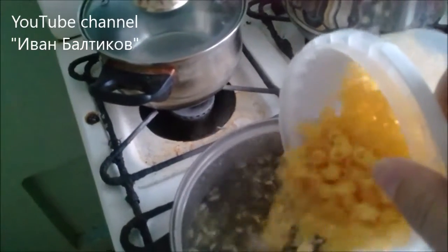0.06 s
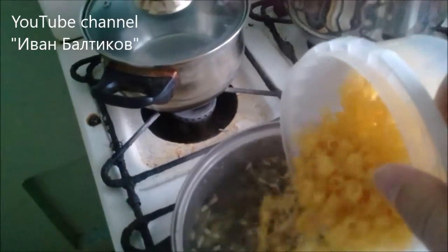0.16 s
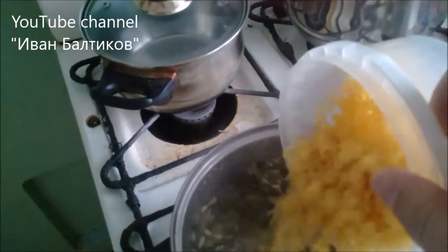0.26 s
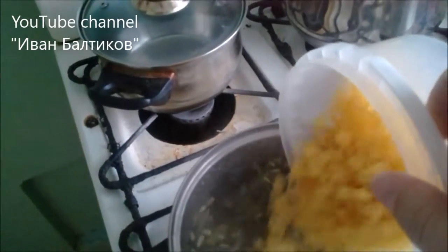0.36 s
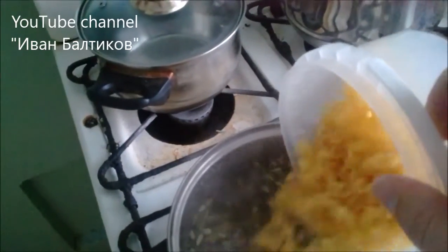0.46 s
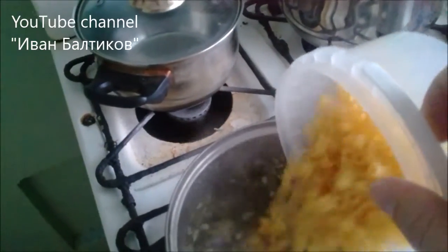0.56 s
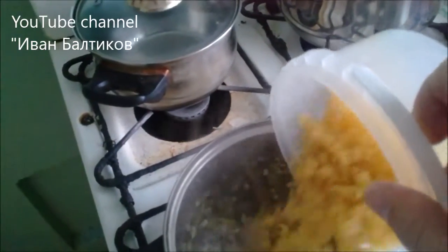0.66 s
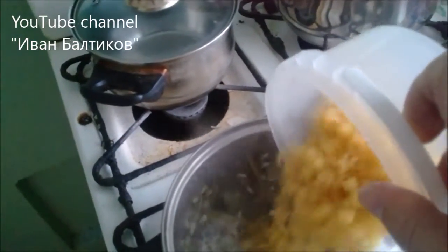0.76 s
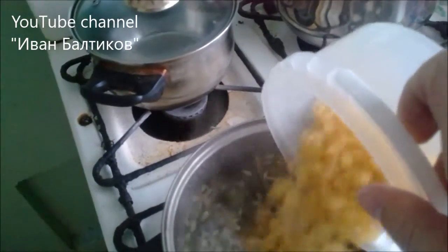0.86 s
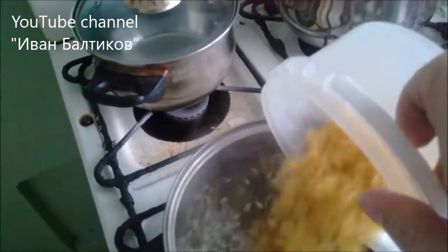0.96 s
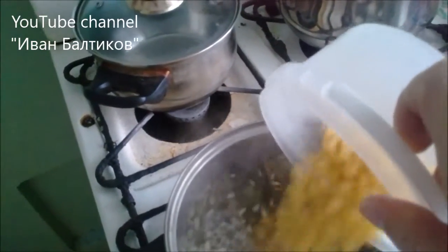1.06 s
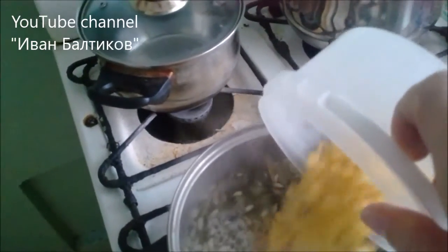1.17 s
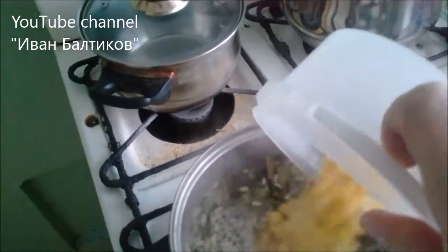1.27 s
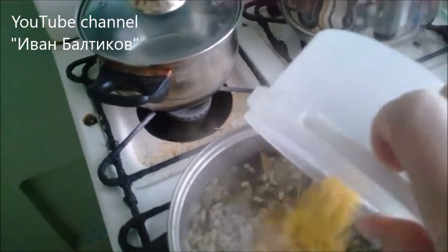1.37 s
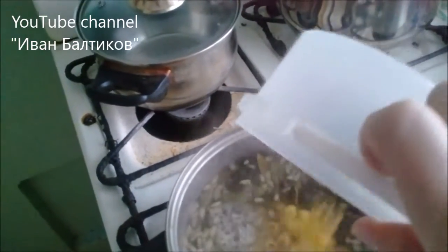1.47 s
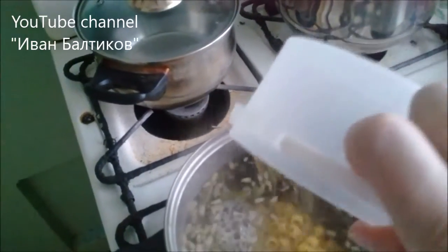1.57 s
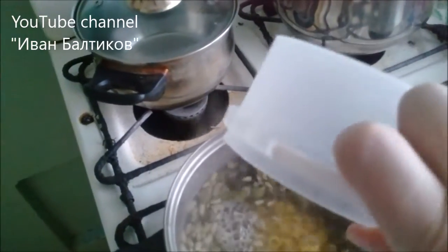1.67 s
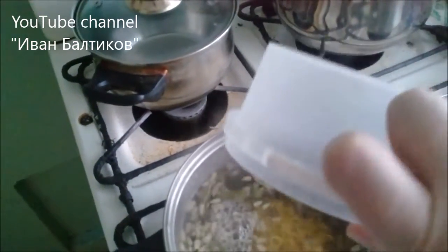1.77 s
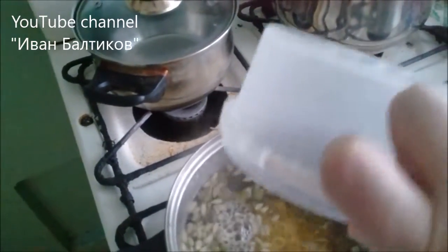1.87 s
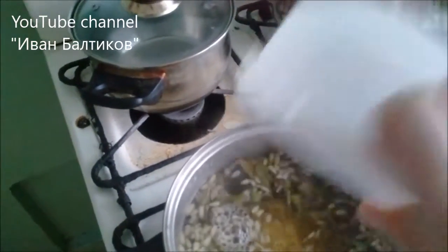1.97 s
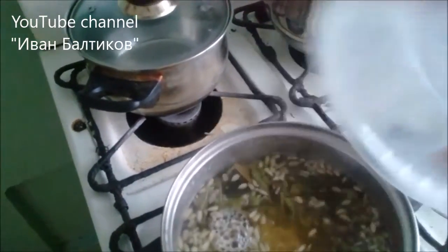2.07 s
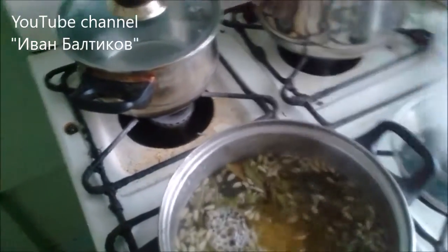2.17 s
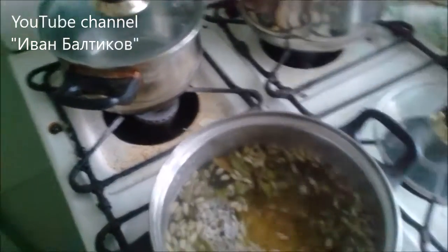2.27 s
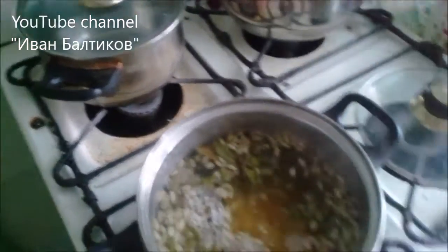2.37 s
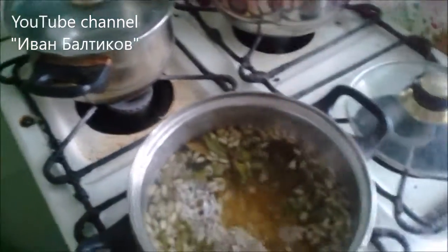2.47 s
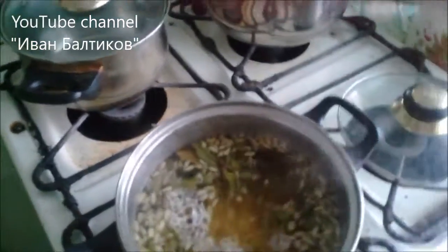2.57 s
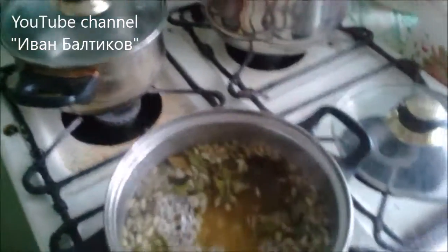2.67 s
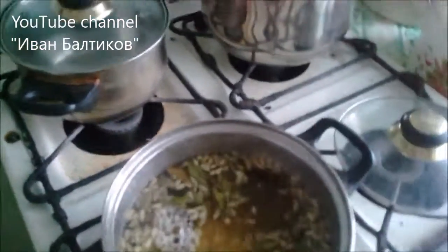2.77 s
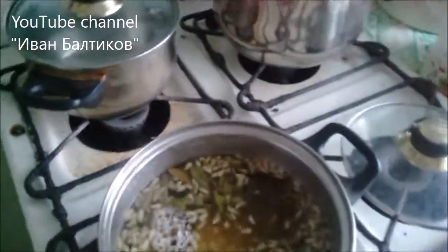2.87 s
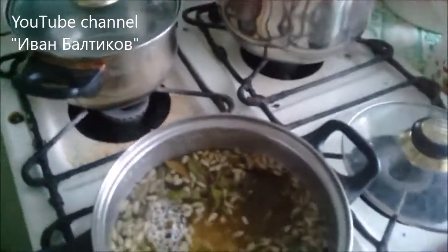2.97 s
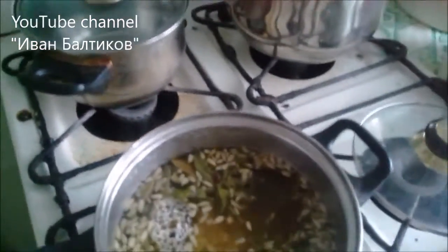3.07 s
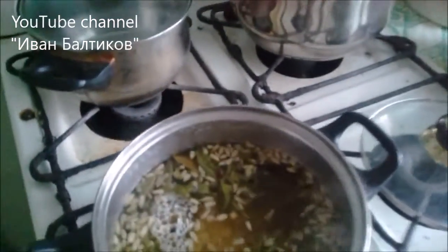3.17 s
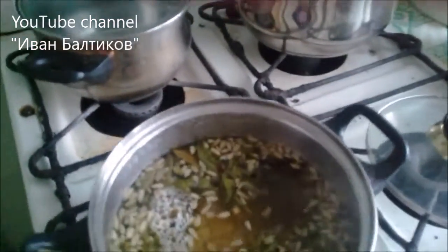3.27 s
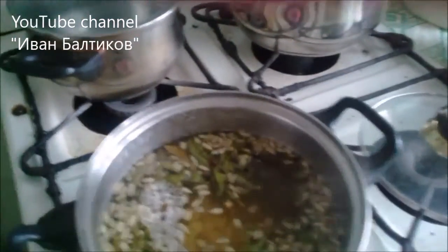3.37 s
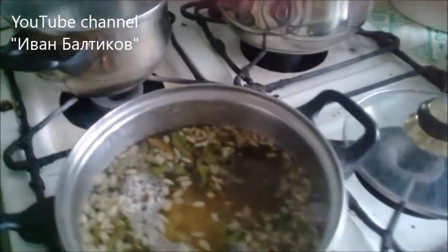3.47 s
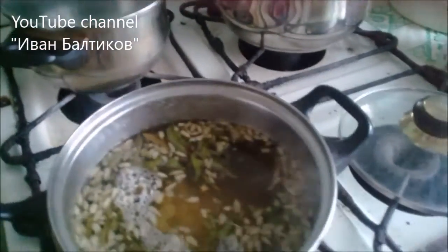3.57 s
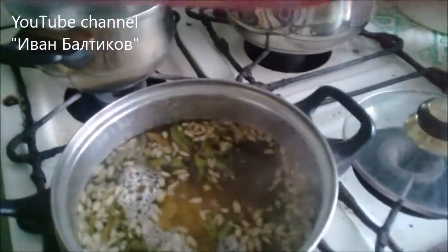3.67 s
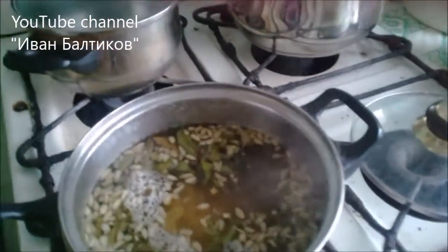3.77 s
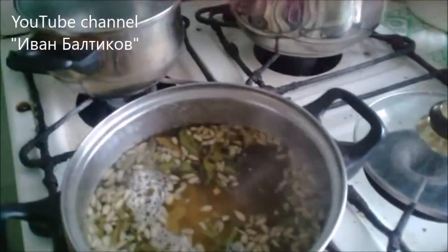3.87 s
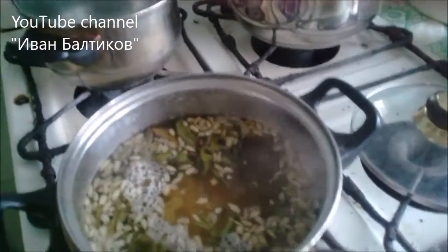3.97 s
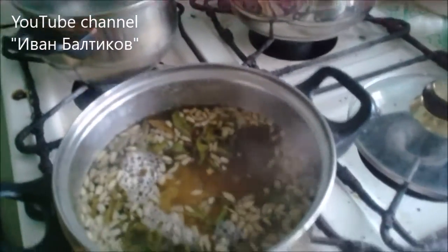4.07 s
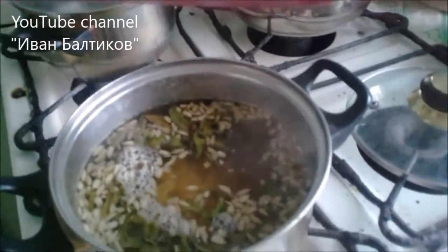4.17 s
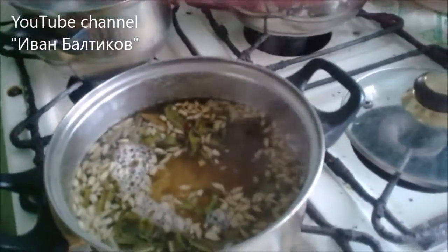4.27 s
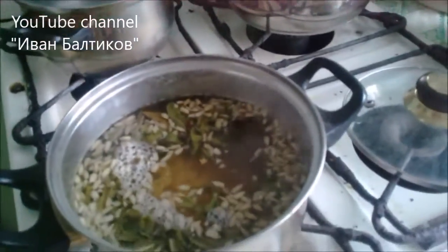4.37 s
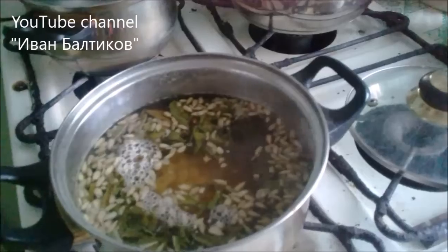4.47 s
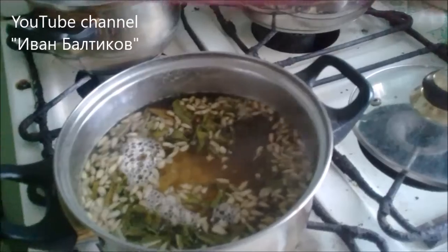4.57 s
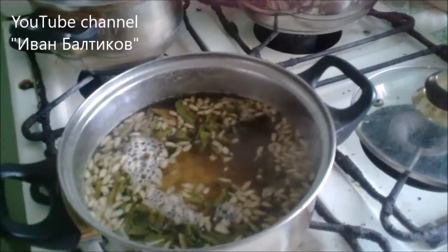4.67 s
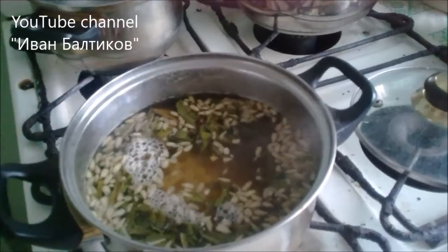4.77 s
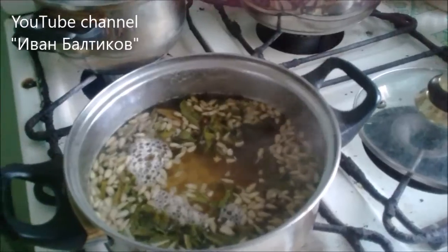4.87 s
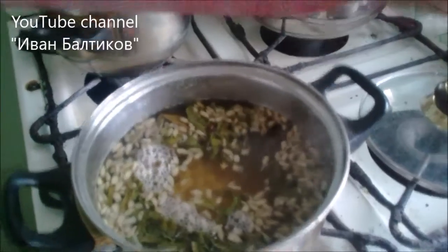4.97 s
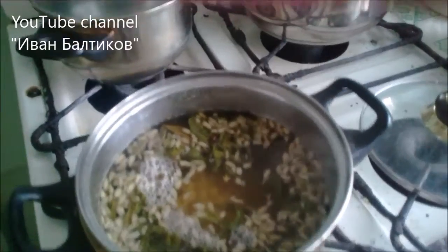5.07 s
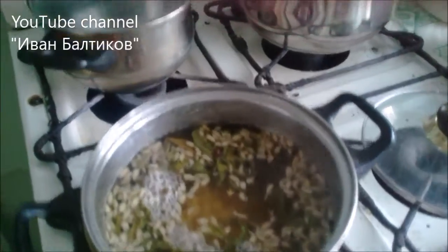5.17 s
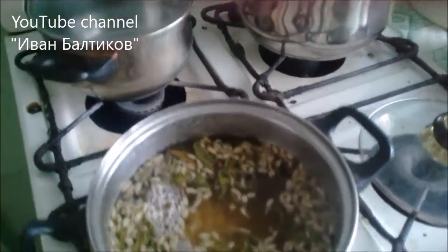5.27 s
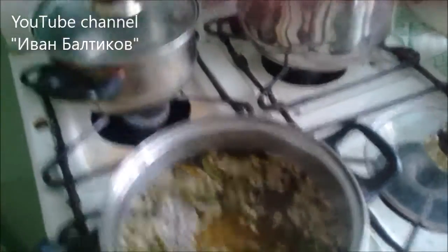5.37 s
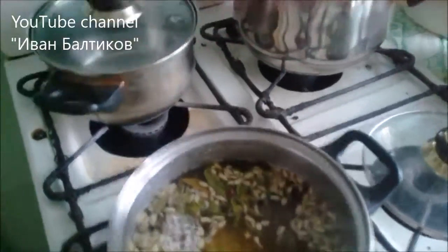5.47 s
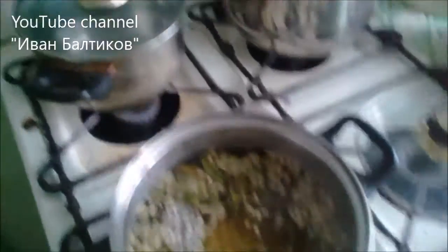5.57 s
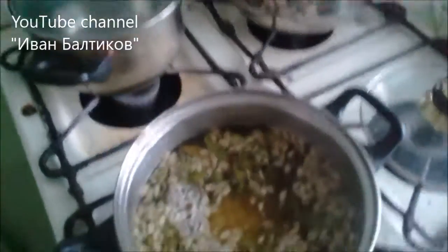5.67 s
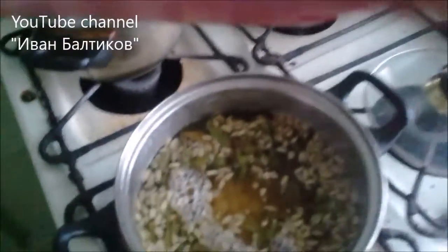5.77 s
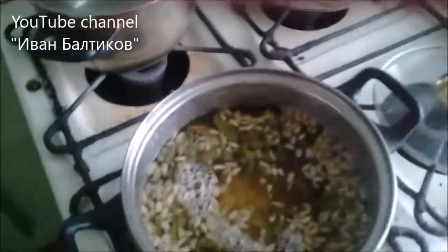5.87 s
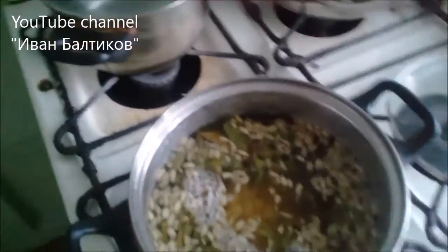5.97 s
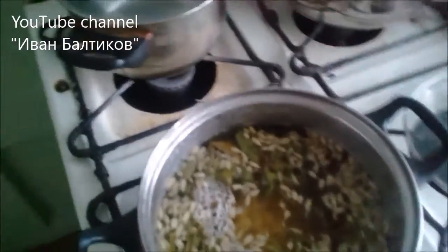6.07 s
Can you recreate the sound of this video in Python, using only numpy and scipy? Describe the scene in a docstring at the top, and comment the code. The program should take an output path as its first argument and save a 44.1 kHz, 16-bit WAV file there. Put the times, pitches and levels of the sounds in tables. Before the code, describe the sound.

Close by in a kitchen, dry pasta slides out of a plastic tub, ticking and rattling against its walls and splashing softly into broth for about a second and a half. Sharp little taps, sleeve swishes and light wooden knocks follow. The empty tub is put down with one loud hollow knock, then come more small knocks and a faint scrape. A gas flame and simmering soup hiss very quietly throughout.

```python
"""Pasta into simmering soup

Dry pasta slides out of a plastic tub, close by in a kitchen: the pieces tick, rattle against the walls
and splash into the broth. Then come sharp taps, sleeve swishes and light knocks off to the side. The
empty tub lands with one hollow knock; a faint drone swells twice and something scrapes the worktop.
The gas flame hisses and the soup fizzes underneath throughout."""
import sys
import numpy as np
from scipy import signal
from scipy.fft import rfft, irfft, next_fast_len
from scipy.io import wavfile
from scipy.ndimage import uniform_filter1d, map_coordinates

SR = 44100
rng = np.random.default_rng(int(sys.argv[2]) if len(sys.argv) > 2 else 0)


def waveform_to_disk(signal):
    """Save audio, clipped to [-1, 1], as 16-bit WAV at the path in sys.argv[1]."""
    frames = np.transpose(np.atleast_2d(signal))
    scaled = np.clip(frames, -1, 1) * 32767
    samples = np.round(scaled).astype(np.int16)
    wavfile.write(sys.argv[1], SR, samples)


N = 269803

# How hard the pasta flows. Each row: time in seconds, level in dB.
POUR_FLOW = [(0, -28.5), (.2, -26), (.45, -23.5), (.85, -22.5), (1.3, -21.5), (1.53, -27), (1.615, -37)]
# Tone of pasta hitting the tub. Each row: frequency in Hz, relative level in dB.
RATTLE_EQ = [(300, -54.5), (900, -30), (1500, -16.5), (1850, -4), (2300, -2.5), (2800, -0.5), (3400, 1.5),
             (4000, -10), (4600, -7.5), (5800, -16.5), (9000, -44), (16000, -51.5)]
# Tone of the pieces' bright ticking. Each row: frequency in Hz, relative level in dB.
TICK_EQ = [(1500, -44), (4000, -16), (5800, -12), (6700, -8.5), (8500, -10), (9500, -5), (10400, 0.5),
           (11300, -7), (12500, -13.5), (14000, -20.5), (16000, -24.5)]
# Resonances of the tub's walls during the pour. Each row: pitch in Hz, width in Hz, gain in dB.
WALL_MODES = [(2100, 160, -2.5), (3320, 200, 0), (3540, 160, -1)]
# The thin click on top of a tap or knock. Each row: frequency in Hz, relative level in dB.
CLICK_EQ = [(100, -36.5), (600, -8.5), (1800, -1.5), (2900, 6), (4200, -5.5), (6000, -6), (8500, -3),
            (10300, 7.5), (12000, -7), (16000, -20.5)]


def amp(db):
    """Decibels to gain."""
    return 10 ** (np.asarray(db) / 20)


def unit(x):
    """Scale to rms 1."""
    return x / np.sqrt(np.mean(x ** 2) + 1e-20)


def along(points, hz):
    """Read (Hz, value) points on a log frequency axis."""
    freqs, values = np.transpose(points)
    return np.interp(np.log(hz + 1), np.log(freqs + 1), values)


def since(s):
    """Seconds gone since time s, 0 before it."""
    return np.maximum(np.arange(N) / SR - s, 0)


def decay(t, t60):
    """Envelope that falls 60 dB in t60 seconds."""
    return np.exp(-np.log(1000) * t / t60)


def during(rows):
    """Soft-edged gate, open from a table's first time to its last."""
    t = since(0)
    return uniform_filter1d(1. * ((t >= rows[0][0]) & (t <= rows[-1][0])), size=600)


def stroke(s, length, rise, release_db_per_s):
    """Envelope that swells from time s as time to the power of rise, then dies away."""
    return np.clip(since(s) / length, 0, 1) ** rise * amp(-release_db_per_s * since(s + length))


def wobble(rate):
    """A smooth random curve, rate knots a second."""
    return map_coordinates(rng.standard_normal(int(N * rate / SR) + 4), [np.arange(N) * rate / SR])


def add(track, s, sound):
    """Mix a sound into a track at time s."""
    part = track[max(round(s * SR), 0):][:len(sound)]
    part += sound[:len(part)]


def colour(x, eq, size=4096):
    """Minimum-phase EQ of unit energy: the curve sets the tone, not the level."""
    cepstrum = irfft(np.log(amp(along(eq, np.fft.rfftfreq(size, 1 / SR)))))
    cepstrum[1:size // 2] *= 2
    cepstrum[size // 2 + 1:] = 0
    kernel = irfft(np.exp(rfft(cepstrum)))
    return signal.fftconvolve(x, kernel / np.linalg.norm(kernel))[:len(x)]


def resonate(x, modes):
    """Ring x through (pitch Hz, width Hz, gain dB) resonances."""
    return sum(amp(db) * signal.lfilter(*signal.iirpeak(hz, hz / width, SR), x)
               for hz, width, db in modes)


def burst(t60):
    """A noisy contact of unit energy."""
    t = np.arange(SR // 10) / SR
    noise = rng.standard_normal(len(t)) * decay(t, t60)
    return noise / np.linalg.norm(noise)


def grains(rate, lo_hz, hi_hz, t60, spread_db):
    """Random contacts, rate a second, each a ping at its own pitch; rms 1."""
    t = np.arange(SR // 20) / SR
    t = t[t < t60]
    onsets = np.flatnonzero(rng.random(N) < rate / SR)
    sizes = amp(spread_db * np.clip(rng.standard_normal(N), -2, 2))[onsets, None]
    pitch = rng.uniform(lo_hz, hi_hz, N)[onsets, None]
    polarity = rng.choice([-1, 1], N)[onsets, None]
    pings = sizes * polarity * np.sin(2 * np.pi * pitch * t) * decay(t, t60)
    positions = onsets[:, None] + np.arange(len(t))
    cloud = np.bincount(positions.ravel(), pings.ravel(), N)[:N]
    return unit(cloud / np.sqrt(rate))  # density changes the texture, not the level


def room_tail():
    """The kitchen's reverb, of unit energy; the treble dies first."""
    # Each row: frequency in Hz, time to fall 60 dB in seconds.
    reverb_times = [(150, 0.77), (400, 0.6), (1000, 0.39), (2800, 0.4), (7000, 0.33), (14000, 0.23)]
    hz, t, noise = signal.stft(rng.standard_normal(SR * 3 // 4), SR, nperseg=256)
    tail = signal.istft(noise * decay(t, along(reverb_times, hz)[:, None]), SR, nperseg=256)[1]
    return tail / np.linalg.norm(tail)


def in_room(x, wet_db):
    """Direct sound plus reverb, at the same total power."""
    reverb = amp(wet_db) * signal.fftconvolve(x, room_tail())[:N]
    return (x + reverb) / np.hypot(1, amp(wet_db))


def far_blow(direct):
    """A contact some way off: a little direct sound, mostly room."""
    blow = room_tail()
    add(blow, 0, direct * burst(t60=0.018))
    return blow


def stove():
    """The gas flame hisses, the soup fizzes, and now and then a bubble bursts."""
    # Tones of flame, fizz and bubble. Each row: frequency in Hz, relative level in dB.
    flame_eq = [(25, -4), (80, -17), (150, -5.5), (400, 0.5), (1000, 0), (1800, 1.5), (2700, -1.5),
                (3600, -7), (6000, -13), (8500, -10), (10300, -4), (12000, -13), (16000, -19)]
    fizz_eq = [(2000, -31.5), (6000, -14), (8500, -13), (10300, 3), (12000, -12), (15500, -14)]
    pop_eq = [(2000, -36), (6000, -13.5), (8500, -12.5), (10300, 3), (12000, -12), (15500, -10.5)]
    # The loudest bubbles. Each row: start in seconds, level in dB.
    pops = [(2.354, -26.5), (3.5643, -17), (3.7019, -23), (3.9479, -30), (4.4833, -30.5), (5.0387, -27.5),
            (5.242, -24.5)]
    flame = amp(-61.5 + 0.54 * wobble(5.8)) * unit(colour(rng.standard_normal(N), flame_eq))
    bubbles = grains(350, 6000, 14000, t60=.0012, spread_db=5.0)
    simmer = amp(-66.5) * unit(colour(bubbles, fizz_eq))
    for s, db in pops:
        add(simmer, s, amp(db) * colour(burst(t60=0.0033), pop_eq))
    return flame + in_room(simmer, wet_db=-2)


def pasta():
    """Pieces tumble in clumps, ticking, ringing the tub and landing in broth. The flow drives it all."""
    full_rate = 2600  # collisions a second at full flow
    bulk_gone_s, thinning_db_per_s = 1.451, 145  # then only stragglers: the rattle dies before the ticks
    flow_db = np.interp(since(0), *np.transpose(POUR_FLOW))
    bulk_db = flow_db - thinning_db_per_s * since(bulk_gone_s)
    thin_db = flow_db.max() - flow_db
    rate = full_rate * amp(-thin_db) ** 1.1
    clump_db = 1.15 + 0.071 * thin_db  # a thinner stream is lumpier
    clumps = during(POUR_FLOW) * unit(amp(clump_db * wobble(90) + 1.47 * wobble(500)))
    contacts = grains(rate, 1190, 5420, t60=0.0071, spread_db=0)
    rattle = amp(bulk_db - 2) * unit(colour(contacts, RATTLE_EQ))
    wall_db = bulk_db - 12.5 + 4.5 * since(0)  # the walls ring freer as the load leaves
    walls = amp(wall_db) * unit(resonate(contacts, WALL_MODES))
    fine_contacts = grains(2 * rate, 3970, 16000, t60=0.0021, spread_db=1.5)
    ticks = amp(flow_db) * unit(colour(fine_contacts, TICK_EQ))
    in_tub = clumps * (rattle + walls + ticks) + clacks(bulk_db)
    return in_room(in_tub, wet_db=-12) + in_room(splash(bulk_db, rate), wet_db=-4.5)


def splash(bulk_db, rate):
    """Loudest as the stream plunges into the broth, softer as the growing heap cushions it."""
    # Tone of the broth. Each row: frequency in Hz, relative level in dB.
    splash_eq = [(30, -26), (80, -40), (150, -21.5), (300, -18.5), (500, -17), (750, -2), (1200, -1.5),
                 (1800, -4.5), (4000, -32.5)]
    plunge_s, plunge_fade_s, heap_db_per_s = .206, 0.29, 4.5
    plunge_db = 8.5 * (since(plunge_s) > 0) * np.exp(-since(plunge_s) / plunge_fade_s)
    level_db = bulk_db - 17 + plunge_db - heap_db_per_s * since(0) + 1.7 * wobble(24.94)
    plops = grains(rate / 3, 203, 2000, t60=0.025, spread_db=1)
    return amp(level_db) * during(POUR_FLOW) * unit(colour(plops, splash_eq))


def clacks(bulk_db):
    """Single pieces strike the tub hard; stray hits fall at random while the pour lasts."""
    # The accents of the pour. Each row: start in seconds, level in dB.
    hard_hits = [(.0866, 3), (.169, -2), (.4344, -1), (.4624, 2.5), (.628, 4), (.7464, 2), (1.036, 2.5),
                 (1.059, 2.5), (1.0919, 5), (1.1504, 0), (1.2006, 5), (1.272, 3), (1.3334, 0.5),
                 (1.3969, -1), (1.4557, -3.5), (1.489, -3.5), (1.539, -10.5), (1.6014, -16)]
    strays_per_s = 9
    out = np.zeros(N)
    strays = np.flatnonzero(rng.random(N) < during(POUR_FLOW) * strays_per_s / SR)
    stray_db = bulk_db + 17.5 + 2 * rng.standard_normal(N)
    for s, db in [*hard_hits, *zip(strays / SR, stray_db[strays])]:
        hit = burst(t60=0.016)
        clack = colour(hit, RATTLE_EQ) + 0.69 * colour(hit, TICK_EQ) + resonate(hit, WALL_MODES)
        add(out, s, amp(db) * clack)
    return out


def taps():
    """Sharp taps nearby; each touches twice in a quick rebound."""
    # Each row: start in seconds, body level in dB, click level in dB.
    cues = [(1.872, -32, -23), (3.193, -23, -19), (4.553, -39, -21.5), (5.918, -13.5, -28),
            (6.088, -19, -7.5)]
    # Tone of a tap's body. Each row: frequency in Hz, relative level in dB.
    body_eq = [(40, -45), (100, -26.5), (170, -3.5), (500, -17), (1000, -11), (1450, 4.5), (2000, -3.5),
               (2600, 2.5), (3300, -12.5), (6000, -19), (12000, -28)]
    rebound_s, rebound_db = .0035, -7.5
    out = np.zeros(N)
    for s, body_db, click_db in cues:
        for delay, touch_db in [(0, 0), (rebound_s, rebound_db)]:
            hit = amp(touch_db) * burst(t60=0.0059)
            tap = amp(body_db) * colour(hit, body_eq) + amp(click_db) * colour(hit, CLICK_EQ)
            add(out, s + delay, tap)
    return in_room(out, wet_db=3)


def sleeve():
    """Sleeve and hand brush past: thousands of tiny slips blur into each swish."""
    # Each row: start in seconds, swell time in seconds, power of the swell curve, hiss level in dB,
    # body in dB relative to the hiss.
    swishes = [(2.032, 0.078, 0.72, -40.5, -5.5), (2.394, 0.027, 0.71, -47.5, -1),
               (2.729, 0.053, 0.25, -45.5, -12), (2.88, .03, .5, -61, 0), (3.385, 0.035, .7, -53.5, 0),
               (3.706, 0.044, 1, -54, -0.5), (4.501, 0.089, 0.35, -55.5, -2), (5.547, 0.032, 1, -55.5, -7),
               (5.646, .05, .4, -55.5, -10.5), (5.917, 0.069, 0.56, -38, -10.5)]
    # Tones of the cloth's hiss and body. Each row: frequency in Hz, relative level in dB.
    hiss_eq = [(1000, -49.5), (3000, -20), (4500, -10.5), (6000, -9), (8300, -8.5), (10300, 2.5),
               (12000, -9.5), (15800, -22)]
    body_eq = [(40, -40), (90, -24), (170, -6), (400, -9.5), (800, -7), (1500, 2.5), (2000, 2.5), (3000, 3),
               (4200, -6), (8000, -38)]
    slips = grains(9000, 99.8, 16000, t60=0.00041, spread_db=1.5)
    hiss, body = unit(colour(slips, hiss_eq)), unit(colour(slips, body_eq))
    cloth = sum(amp(db) * stroke(s, length, rise, release_db_per_s=280.5) * (hiss + amp(body_db) * body)
                for s, length, rise, db, body_db in swishes)
    return in_room(cloth, wet_db=-7.5)


def knocks():
    """Things handled off to the side knock on wood, each with a thin click and a low thud."""
    # Each row: start in seconds, wood level in dB, then click and thud in dB relative to the wood.
    cues = [(2.785, -19, -8, -11), (2.99, -17, -12.5, -20), (3.062, -19.5, -14, -12),
            (3.192, -11, -5, -20.5), (3.287, -19, -4, -19), (3.723, -17.5, -6, -17), (4.066, -29, -14, -21),
            (4.163, -30, -4, -15), (4.727, -18, -11, -15), (4.835, -18.5, -5, -12), (4.976, -21, -5.5, -20),
            (5.037, -26, -12, -15), (5.918, -28.5, 4, 5.5)]
    # Tones of the wood and the thud. Each row: frequency in Hz, relative level in dB.
    wood_eq = [(80, -24), (200, -12), (380, -4), (650, 1.5), (1000, 1), (1400, 0.5), (2200, -3),
               (3000, -12.5), (6000, -45)]
    thud_eq = [(40, -23.5), (90, -15), (140, 0), (250, -7.5), (340, -0.5), (600, -8.5), (2000, -29.5)]
    out = np.zeros(N)
    for s, db, click_db, thud_db in cues:
        blow = far_blow(direct=0.35)
        click = amp(click_db) * colour(blow, CLICK_EQ)
        thud = amp(thud_db) * colour(blow, thud_eq)
        add(out, s, amp(db) * (colour(blow, wood_eq) + click + thud))
    return out


def empty_tub():
    """The tub is put down: a hollow clap from each contact, and its walls ring on."""
    # It lands on one edge, then flat. Each row: start in seconds, level in dB.
    landings = [(3.447, 9.5), (3.457, 11)]
    # Tone of the hollow clap. Each row: frequency in Hz, relative level in dB.
    clap_eq = [(40, -53), (90, -44), (160, -30), (300, -22), (550, -11), (750, -3), (1100, -1.5),
               (1400, -2.5), (2050, -4.5), (2350, -16.5), (3400, -20), (3700, -27), (6000, -37.5),
               (14000, -47.5)]
    # The empty tub's ring. Each row: pitch in Hz, relative level in dB, time to fall 60 dB in seconds.
    modes = [(328, -24, .6), (511, -16, .24), (727, 2, .31), (765, -1, .3), (889, -3, .22), (942, -10, .26),
             (1084, -11, .33), (1156, -8, .28), (1242, -7, .26), (1413, -7, .27), (1701, -12, .27),
             (1965, -10, .26), (2065, -12, .28), (3222, -21, .27)]
    out, t = np.zeros(N), np.arange(SR) / SR
    for s, db in landings:
        blow = far_blow(direct=0.62)
        add(out, s, amp(db) * (colour(blow, clap_eq) + amp(-26) * colour(blow, CLICK_EQ)))
    ring = sum(amp(db + rng.normal(0, 1)) * np.sin(2 * np.pi * (hz * t + rng.random())) * decay(t, t60)
               for hz, db, t60 in modes)
    bloom = 1 - np.exp(-t / 0.024)
    add(out, landings[0][0], amp(-17.5) * ring * bloom)
    return out


def drone():
    """A faint, wavering band of noise near 135 Hz swells twice and fades."""
    # Each row: start in seconds, level in dB.
    swells = [(3.815, -65.5), (4.15, -66.5)]
    # Tone of the drone. Each row: frequency in Hz, relative level in dB.
    drone_eq = [(90, -37), (122, -8.5), (135, 2), (150, -6), (165, -5), (210, -42), (600, -83)]
    band = unit(colour(rng.standard_normal(N), drone_eq))
    return band * sum(amp(db) * stroke(s, length=.03, rise=0.94, release_db_per_s=60) for s, db in swells)


def scrape():
    """Something is pushed briefly along the worktop, catching and ringing as it slides."""
    # Tone of the worktop. Each row: frequency in Hz, relative level in dB.
    worktop_eq = [(180, -54), (300, -11), (341, -20), (769, -8), (876, -7.5), (1630, -10), (1900, 0),
                  (3120, -31), (5000, -36), (6500, -55), (11000, -120)]
    # Resonances of the pushed object. Each row: pitch in Hz, width in Hz, gain in dB.
    modes = [(870, 140, 0), (1900, 300, 3)]
    push = amp(-48.5) * stroke(s=4.495, length=0.1, rise=.9, release_db_per_s=260)
    catches = colour(grains(1500, 390, 3800, t60=0.0065, spread_db=3), worktop_eq)
    return in_room(push * unit(0.7 * catches + resonate(catches, modes)), wet_db=-5)


def scene():
    """The pour and the handling over the bed of the stove, in mono."""
    return (pasta() + empty_tub() + knocks() + taps() + sleeve() + scrape() + stove() + drone())[None]


def record(dry):
    """A brick-wall low-pass trims the very top of the treble."""
    top_hz = 15950
    size = next_fast_len(N + SR // 2)
    passband = np.fft.rfftfreq(size, 1 / SR) < top_hz
    return irfft(rfft(dry, size) * passband, size)[..., :N]


dry = scene()
out = record(dry)
waveform_to_disk(out)
```